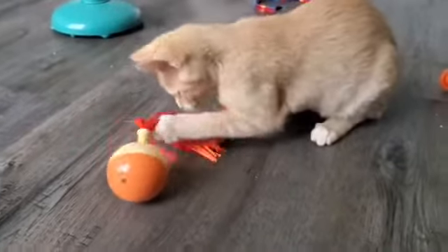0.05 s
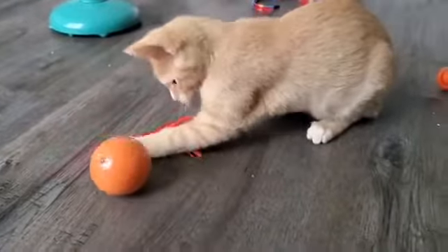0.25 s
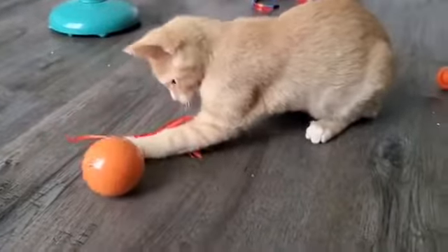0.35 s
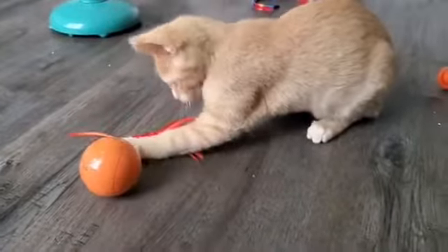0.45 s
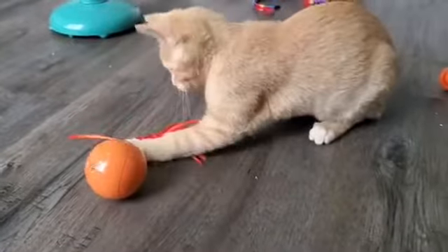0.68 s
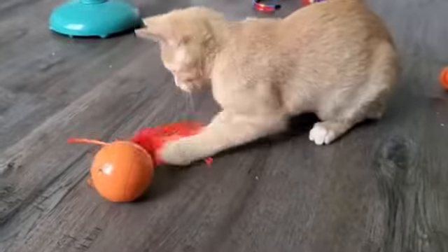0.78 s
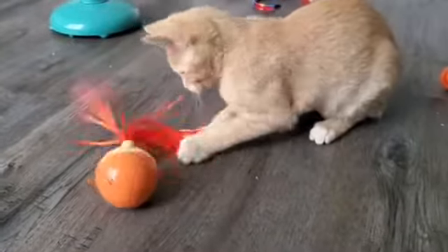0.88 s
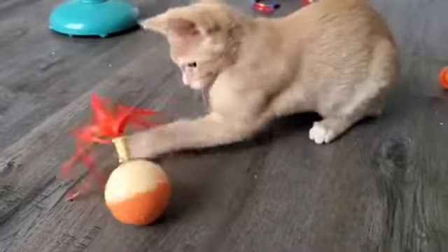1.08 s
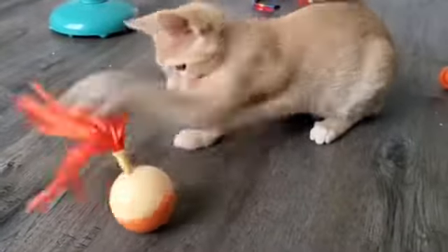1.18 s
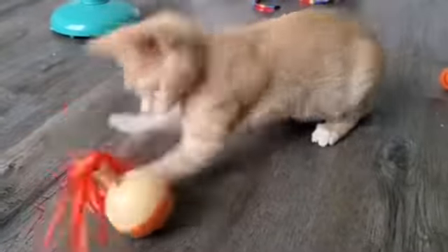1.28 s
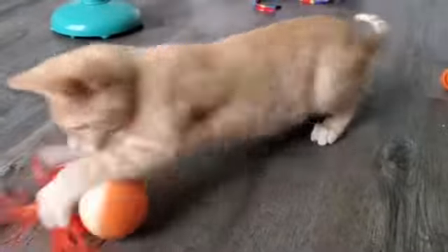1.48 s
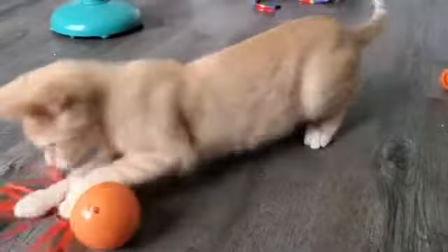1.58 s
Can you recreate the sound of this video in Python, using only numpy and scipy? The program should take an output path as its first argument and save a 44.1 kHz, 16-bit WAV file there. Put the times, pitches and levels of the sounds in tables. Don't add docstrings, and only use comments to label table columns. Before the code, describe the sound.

A light hollow plastic ball knocks on laminate flooring. Faint claw ticks at 0.2 s lead to a bright clack at 0.23 and a woody bump at 0.26, ringing briefly in a small room. Low hum and slight rustle follow, with soft bumps around 0.9-1.1. At 1.28-1.37 come quick taps, another knock and paw thuds, then rustling, tiny claw squeaks and scuffs until about 1.65.

```python
import sys
import numpy as np
from scipy import signal
from scipy.fft import rfft, irfft
from scipy.io import wavfile
from scipy.ndimage import uniform_filter1d

SR = 44100
rng = np.random.default_rng(int(sys.argv[2]) if len(sys.argv) > 2 else 0)


def boost(x):
    u = np.asarray(x, float) / 20
    return 10 ** u


def file_out(sig):
    cols = np.atleast_2d(sig).T
    lim = np.clip(cols, -1, 1)
    pcm = np.round(lim * 32767).astype(np.int16)
    wavfile.write(sys.argv[1], SR, pcm)


N = 72765
T = np.arange(N) / SR
F = np.fft.rfftfreq(N, 1 / SR)

# [t/s, level/dB, contact/ms, upper modes/dB]
BUMPS = [(0.1908, -34.5, 2.5, 3.5), (0.2011, -33.5, 2.3, 9), (0.2306, -19, 1.61, 8),
         (0.2641, -13, 0.91, -3.5), (0.294, -50, 4, 1), (0.321, -31.5, 3.4, 5), (0.878, -36.5, 3.61, -7),
         (0.939, -33.5, 2.43, -1), (.965, -34, 2.33, -14), (1.005, -37.5, 2.58, -2.5),
         (1.088, -49.5, 2.35, 6), (1.14, -49, 2.88, 19.5), (1.282, -37, 1.1, 0), (1.335, -29.5, 1.1, -6),
         (1.351, -21, 0.8, 3.5), (1.37, -44, 1.18, 1), (1.42, -62, 1.9, 20), (1.49, -40, 3.6, -3),
         (1.39, -40.5, 2, 7), (1.509, -42.5, 1.84, 3.5), (1.534, -47, 1.2, -1.5), (1.555, -37.5, 2.8, 13),
         (1.565, -41.5, 2.4, 9.5), (1.576, -36, 2.3, -0.5), (1.596, -36, 3, -13), (1.624, -42, 8.8, 21)]
# [f/Hz, level/dB, t60/s]
BOARD_MODES = [(67, -16, .3), (106, -20.5, 0.088), (180, -38, 0.22), (206.95, -2.5, 0.13),
               (249.4, -10.5, 0.14), (339, -5, 0.036), (435, -23, 0.072), (511, -8.5, 0.013),
               (717, -19.5, 0.0058), (1120, -9.5, 0.012)]
UPPER_FROM_HZ = 300
# [t/s, level/dB, pitch ratio, contact/ms]
CLACKS = [(0.23048, -4.5, 0.98, 0.07), (.2478, -20, 0.8, 0.2), (1.356, -27, 0.7, 0.3),
          (.2492, -46, 0.93, 0.18), (1.2822, -30.5, 0.894, .1), (1.2825, -19, 0.8, 0.2),
          (1.2858, -17, 0.75, 0.25), (1.288, -23, 1, 0.2), (.448, -45, 0.84, 0.05), (0.968, -45, 0.9, .4),
          (1.5807, -28, 1.1, 0.072), (1.2086, -48.5, 0.85, 0.027)]
# [f/Hz, level/dB, t60/s]
SHELL_MODES = [(1520, -14.5, 0.0067), (2635, -3, 0.0066), (3478, -18.5, 0.0027), (3920, -5, 0.0047),
               (6280, -1, 0.0041), (8180, -1, 0.0035), (8796, -13, 0.0046), (12050, -1.5, 0.0077)]
CLACK_TO_ROOM_DB = 11.5
# [t/s, level/dB, f/Hz]
HOLLOW_NOTES = [
    (.2642, -31.5, 1110),
    (1.3518, -32, 1120),
    (1.2, -56.5, 890),
]
HOLLOW_T60_S = 0.027
# [t/s, level/dB, contact/ms]
PAWS = [
    (0.269, -31.5, 10),
    (0.31, -37, 18),
    (0.658, -39.5, 6.8),
    (1.039, -46, 3.8),
    (1.309, -31.5, 9.2),
    (1.367, -26, 4.8),
    (1.411, -39.5, 6.8),
    (1.582, -36, 6.7),
]
JOIST_HZ, JOIST_T60_S = 66, 0.36
# [t/s, level/dB, length/ms, centre f/Hz]
SCRATCHES = [(0.1824, -52, 4, 6500), (0.194, -53, 1.9, 7000), (.197, -50, 4.4, 9130),
             (.206, -60, 2.9, 8000), (0.213, -63.5, 6.6, 8000), (0.189, -63, 4, 5000), (.2, -60.5, 4, 4500),
             (0.202, -51, 3, 11500), (0.213, -60, 5, 4500), (0.22, -54, 4, 11000), (0.22, -63, 3, 4000),
             (0.2289, -28, 1.1, 7000), (1.2082, -44, 1.2, 11500), (1.2082, -49, 1.5, 7000),
             (1.5806, -37, 2.5, 6200), (1.212, -56, 5, 8920), (1.226, -61.5, 18, 11000),
             (1.2304, -60, 2, 11900), (1.2502, -58, 2.5, 11400), (1.2622, -52, 8, 8500),
             (1.263, -54, 3, 12500), (1.281, -53, 8, 4200), (1.5829, -41, 2.2, 8900),
             (1.501, -54, 10, 9000), (1.595, -43.5, 14, 7540)]
# [t/s, level/dB, length/ms, slip rate f/Hz]
SQUEAKS = [
    (1.2822, -42, 2.4, 1990),
    (1.2872, -42, 3, 2020),
    (1.4835, -44, 3.2, 900),
    (1.4875, -41, 3.8, 1100),
    (1.4928, -44, 4.4, 1500),
    (1.498, -38.5, 2.8, 1600),
    (1.5975, -52, 3.5, 1500),
    (1.6025, -49, 4.1, 1400),
    (1.6075, -45.5, 3.5, 1300),
]
SQUEAK_HZ, SQUEAK_OCTAVES, SQUEAK_JITTER_DB, SQUEAK_FROM_HZ = 8800, 0.5, 2.5, 6200
# [t/s, level/dB]
RUSTLE_LEVELS = [(0, -74), (.05, -70.5), (.14, -80), (.7, -79), (.76, -70), (.83, -63.5), (.92, -74),
                 (1.0, -77.5), (1.05, -66), (1.12, -74.5), (1.2, -78.5), (1.27, -55), (1.295, -45),
                 (1.45, -66), (1.5, -52.5), (1.56, -47), (1.65, -54.5)]
# [f/Hz, level/dB]
RUSTLE_TONE = [(800, 12), (2000, -37.5), (3300, 3), (5000, 4.5), (7500, 14.5), (10000, 5), (12000, 14),
               (14000, 11)]
GRAINS_PER_S, GRAIN_SPREAD_DB = 7000, 2.2
# [t/s, level/dB]
SLIDE_LEVELS = [(0, -86), (.17, -114.5), (.195, -58.5), (.23, -67), (.3, -76.5), (.7, -80), (.8, -70),
                (.95, -83), (1.2, -90), (1.27, -58), (1.3, -49.5), (1.4, -56.5), (1.47, -61), (1.58, -57),
                (1.65, -59)]
SLIDE_HZ, SLIDE_OCTAVES = 1880, 0.42
# [f/Hz, level/dB]
PORT_TILT = [(60, -6.5), (200, 1), (600, 3), (2000, 13), (4500, 1), (8000, 16), (12000, -8)]
PORT_LAG_S, CLACK_PAN_DB, SCRATCH_PAN_DB, RUSTLE_PAN_DB = 0.0002, 1.2, 4, -3
# [f/Hz, t60/s, level/dB, left-right likeness/1]
ROOM = [(102, 0.21, -16.5, .95), (212, 0.67, -23, 1), (325, 0.63, -17, 1), (670, 0.45, -9.5, .3),
        (1550, 0.45, -5, -.2), (3240, 0.52, -9, 0.07), (7000, 0.39, -11.5, .1), (11900, 0.3, -7, .1)]
ROOM_GAP_S, ROOM_RISE_S = 0.004, 0.0084
ROOM_STREAK_DB, ROOM_STREAK_BINS, ROOM_PATCH_DB, ROOM_PATCH_PER_S = 1.8, 60, 1.0, 70
# [f/Hz, level per Hz/dB]
HUM_TONE = [(25, 6), (65, 1), (130, -10.5), (300, -15), (500, -17), (750, -39.5), (2000, -42.5),
            (3500, -50.5), (7000, -49), (13000, -58)]
HUM_DB, HUM_FLICKER_DB, HUM_WIDE_HZ, HUM_BASS_SIDE = -50.5, 2.0, 900, 0.22
# [t/s, length/s, low f/Hz, high f/Hz]
DROPOUTS = [(.25, .045, 10150, 11000), (.295, .07, 9850, 10800), (.33, .03, 4150, 4500),
            (.26, .17, 12750, 14000), (.3, .04, 12050, 12400), (.345, .03, 8900, 9400),
            (.37, .065, 8700, 11100), (.36, .07, 11900, 14000), (.66, .2, 2750, 3300),
            (.65, .08, 3700, 4300), (.95, .2, 3600, 4200), (1.06, .08, 2800, 3500), (1.2, .07, 3100, 3700),
            (1.29, .03, 5200, 5600), (1.315, .045, 4300, 4800), (1.34, .025, 5800, 6100),
            (1.37, .07, 9900, 10300), (1.43, .03, 3600, 3950), (1.46, .065, 3050, 3500),
            (1.55, .03, 3750, 4100)]
MASK_DB, MASK_FROM_HZ, MASK_SCATTER_DB = -6.5, 2500, 2.5
LOW_CUT_HZ, MIC_TOP_HZ = 93.5, 13300
TOP_CLICK_DB, TOP_SHELF_DB = 10, -5


def curve(hz, table, col=1):
    a = np.array(table, float)
    return np.interp(np.log(np.maximum(hz, 1)), np.log(a[:, 0]), a[:, col])


def unit(x):
    return x / np.sqrt(np.mean(x ** 2))


def near(s):
    return slice(int(s * SR) - 200, int(s * SR) + 2400)


def push(s, ms, t):
    g = np.exp(-0.5 * ((t - s) / (ms / 4000)) ** 2)
    return g / g.sum()


def ring(x, hz, t60):
    r = np.exp(-np.log(1000) / (t60 * SR))
    w = 2 * np.pi * hz / SR
    return signal.lfilter([0, r * np.sin(w)], [1, -2 * r * np.cos(w), r * r], x)


def bell(f, hz, octaves):
    return np.exp(-0.5 * (np.log2(f / hz) / octaves) ** 2)


def band(spectrum, hz, octaves):
    f = np.linspace(1, SR / 2, spectrum.shape[-1])
    return irfft(spectrum * bell(f, hz, octaves))


def walk(rate):
    k = int(SR / rate)
    return unit(uniform_filter1d(uniform_filter1d(rng.standard_normal(N), k), k))


def bumps():
    force = np.zeros((2, N))
    for s, db, ms, upper_db in BUMPS:
        t = T[near(s)]
        swing = push(s + ms / 1000, ms, t) - 0.38 * push(s, ms / 2, t)
        force[:, near(s)] += boost(db + np.array([[0], [upper_db]])) * swing
    return sum(boost(db) * ring(force[int(hz > UPPER_FROM_HZ)], hz, t60) for hz, db, t60 in BOARD_MODES)


def clacks():
    direct, spread = np.zeros(N), np.zeros(N)
    chance_db = rng.standard_normal((len(CLACKS), len(SHELL_MODES)))
    for (s, db, ratio, ms), mode_chance in zip(CLACKS, chance_db):
        t = T[near(s)]
        tap = push(s, ms, t) * boost(db)
        for k, (hz, mode_db, t60) in enumerate(SHELL_MODES):
            sign = 1 if k % 4 == 0 else -1
            direct[near(s)] += sign * boost(mode_db + mode_chance[k]) * ring(tap, hz * ratio, t60) / 2
        spread[near(s)] += boost(CLACK_TO_ROOM_DB) * (tap - push(s, 0.98, t) * boost(db))
    return direct, spread


def hollow():
    out = np.zeros(N)
    for s, db, hz in HOLLOW_NOTES:
        out[near(s)] += boost(db) * ring(push(s, 0.23, T[near(s)]), hz, HOLLOW_T60_S)
    return out


def paws():
    force = np.zeros(N)
    for s, db, ms in PAWS:
        force[near(s)] += boost(db) * push(s + ms / 1000, ms, T[near(s)])
    return ring(force, JOIST_HZ, JOIST_T60_S)


def grains():
    chance, side, size = rng.random((3, N))
    clicks = (chance < GRAINS_PER_S / SR) * np.sign(side - 0.5) * (size + 1e-9) ** (-GRAIN_SPREAD_DB / 8.7)
    return clicks + 0.2 * rng.standard_normal(N)


def scratches():
    texture, out = grains(), np.zeros(N)
    for s, db, ms, hz in SCRATCHES:
        t = T[near(s)] - s
        attack = np.clip(t / 0.00025, 0, 1)
        fade = np.exp(-np.maximum(t - ms / 1000, 0) / 0.0013)
        burst = unit(band(rfft(texture[near(s)]), hz, 0.44))
        out[near(s)] += boost(db) * attack * fade * burst
    return out


def squeaks():
    out = np.zeros(N)
    k = np.arange(4, 11)[:, None]
    chance = rng.standard_normal((len(SQUEAKS), 2, len(k), 1))
    for (s, db, ms, hz), (jitter, phase) in zip(SQUEAKS, chance):
        t = T[near(s)] - s
        audible = (k * hz < MIC_TOP_HZ) * (k * hz > SQUEAK_FROM_HZ)
        tone = bell(k * hz, SQUEAK_HZ, SQUEAK_OCTAVES) * boost(SQUEAK_JITTER_DB * jitter) * audible
        lines = (tone * np.sin(2 * np.pi * k * hz * t + 2 * phase)).sum(axis=0)
        out[near(s)] += boost(db) * np.exp(-0.5 * (t / (ms / 2500)) ** 2) * lines
    return out


def ports(x, pan_db, tilt=0.0):
    db = pan_db + tilt * curve(F, PORT_TILT)
    left = boost(db / 2)
    right = boost(-db / 2) * np.exp(-2j * np.pi * F * PORT_LAG_S)
    return irfft(rfft(x) * np.array([left, right]), N)


def rustle():
    flutter_db = 2.0 * walk(70)

    def drag(levels, tone):
        s, db = np.transpose(levels)
        return unit(irfft(rfft(grains()) * tone, N)) * boost(np.interp(T, s, db) + flutter_db)

    fur = boost(curve(F, RUSTLE_TONE)) * (F > 700)
    slide = bell(F + 1, SLIDE_HZ, SLIDE_OCTAVES)
    shared = ports(drag(RUSTLE_LEVELS, fur), RUSTLE_PAN_DB)
    own = [1.16 * drag(RUSTLE_LEVELS, fur) + drag(SLIDE_LEVELS, slide) for _ in "LR"]
    return shared + np.array(own)


def room(x):
    t = T[:32768]
    noise = rfft(rng.standard_normal((2, len(t))))
    streaks = unit(uniform_filter1d(rng.standard_normal(noise.shape[1]), size=ROOM_STREAK_BINS))
    noise = noise * boost(ROOM_STREAK_DB * streaks)
    tail = 0
    for hz in 50 * 2 ** np.arange(0, 8.5, 0.5):
        like = np.clip(curve(hz, ROOM, col=3), -1, 1)
        mid, side = band(noise, hz, 0.25)
        pair = np.sqrt(1 + like) * mid + np.sqrt(1 - like) * side * np.array([[1], [-1]])
        patch_db = ROOM_PATCH_DB * (hz > UPPER_FROM_HZ) * walk(ROOM_PATCH_PER_S)[:len(t)]
        decay_db = curve(hz, ROOM, col=2) - 60 * t / curve(hz, ROOM)
        tail = tail + pair * boost(patch_db + decay_db)
    rise = np.clip((t - ROOM_GAP_S) / ROOM_RISE_S, 0, 1)
    return signal.fftconvolve(x[None], tail * rise / 20, axes=1)[:, :N]


def hum():
    bins = N // 2 + 2
    noise = rfft(rng.standard_normal((2, N + 1))) * boost(curve(np.linspace(1, SR / 2, bins), HUM_TONE))
    noise[1] *= np.clip(np.linspace(0, SR / 2, bins) / HUM_WIDE_HZ, HUM_BASS_SIDE, 1)
    out = 0
    for hz in 35 * 2.0 ** np.arange(10):
        out = out + boost(HUM_FLICKER_DB * walk(8)) * band(noise, hz, 0.45)[:, :N]
    mid, side = out
    return np.array([mid + side, mid - side]) * boost(HUM_DB) / np.std(mid)


def scene():
    low = bumps() + paws() + hollow()
    hard, spread = clacks()
    fine = scratches() + squeaks()
    direct = ports(low, -0.2, tilt=0.95) + ports(hard, CLACK_PAN_DB, tilt=1.0) + ports(fine, SCRATCH_PAN_DB)
    return direct + room(low + spread + 0.5 * fine) + rustle() + hum()


def masked(x):
    def smooth(a):
        return uniform_filter1d(uniform_filter1d(a, size=13, axis=1), size=4, axis=2)

    f, t, z = signal.stft(x, SR, nperseg=1024)
    own = smooth(np.mean(abs(z) ** 2, axis=0)[None])
    around = uniform_filter1d(own, size=70, axis=1)
    luck = unit(smooth(rng.standard_normal(z[:1].shape)))
    keep = own > boost(MASK_DB + MASK_SCATTER_DB * luck) ** 2 * around
    keep = keep | (f < MASK_FROM_HZ)[:, None]
    for s, length, low_hz, high_hz in DROPOUTS:
        first, last = np.searchsorted(t, [s, s + length])
        keep[0, (f > low_hz) & (f < high_hz), first:last + 1] = False
    return signal.istft(z * keep, SR, nperseg=1024)[1][:, :N]


def band_limit(x):
    return signal.sosfilt(signal.butter(12, 16450, fs=SR, output="sos"), x)


def record(dry):
    x = signal.sosfilt(signal.butter(2, LOW_CUT_HZ, "high", fs=SR, output="sos"), dry)
    top = irfft(rfft(x) * (F > MIC_TOP_HZ), N)
    quick, slow = [uniform_filter1d(top ** 2, size=size) for size in (60, 1500)]
    sudden = quick > boost(TOP_CLICK_DB) ** 2 * slow
    clicks = boost(TOP_SHELF_DB) * top * uniform_filter1d(1.0 * sudden, size=120)
    mix = masked(x - top) + clicks
    return band_limit(mix)


dry = scene()
out = record(dry)
file_out(out)
```